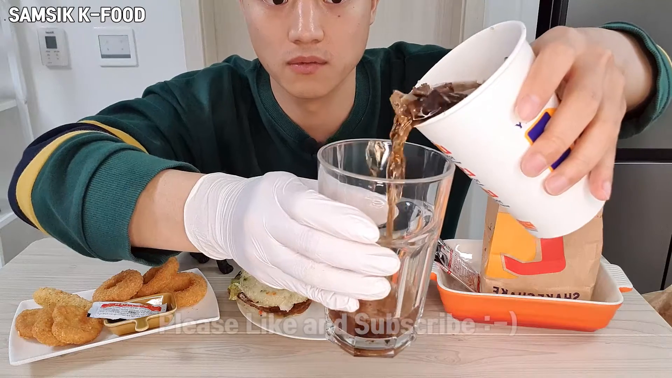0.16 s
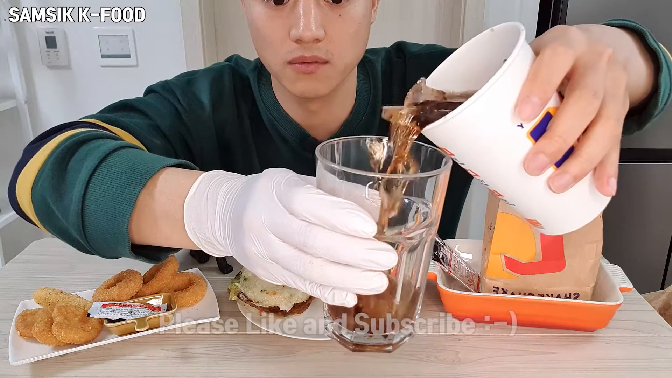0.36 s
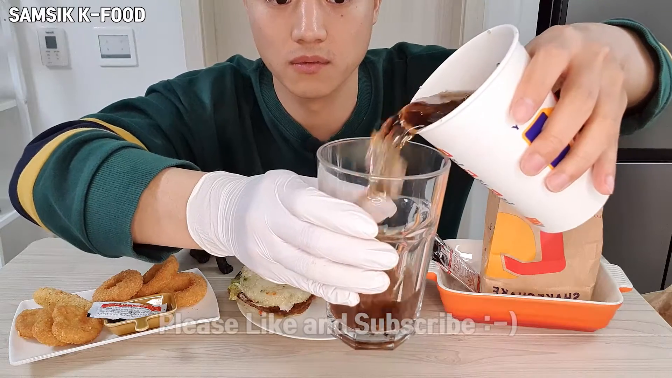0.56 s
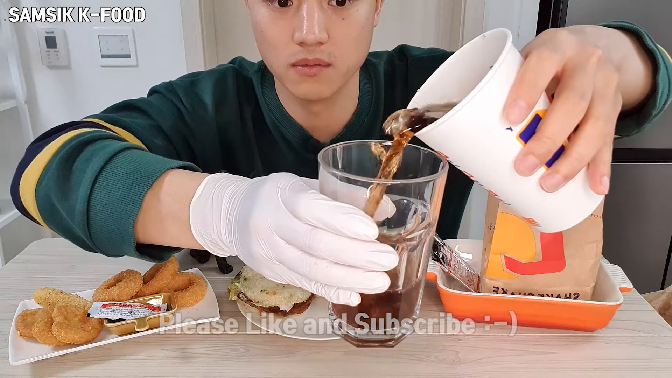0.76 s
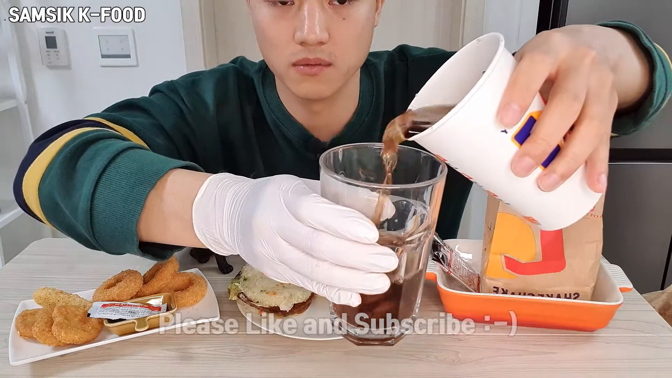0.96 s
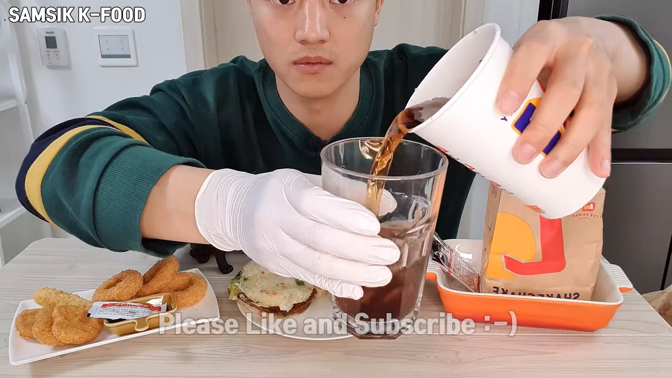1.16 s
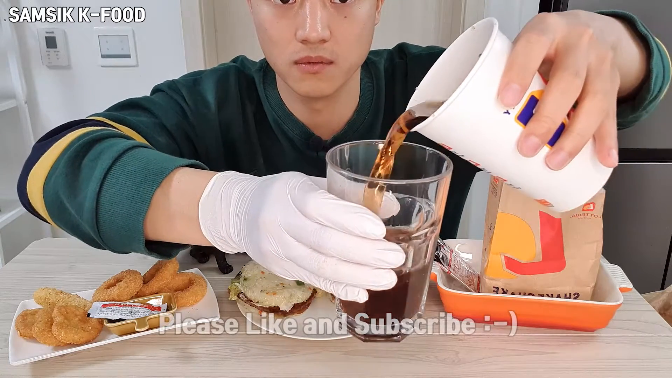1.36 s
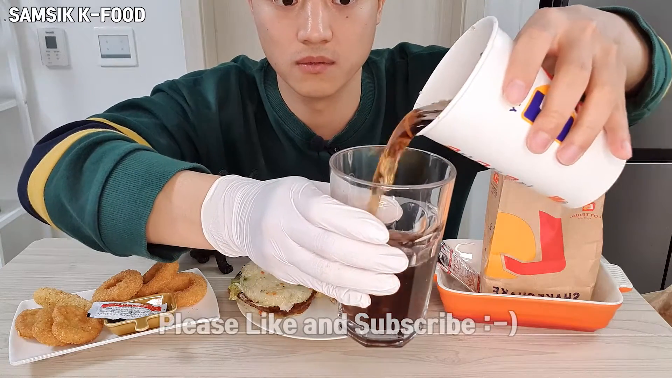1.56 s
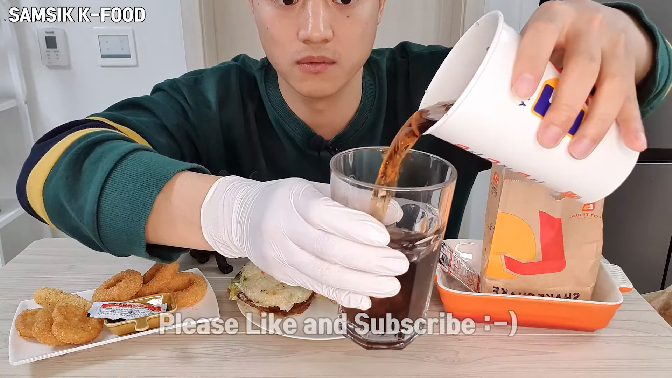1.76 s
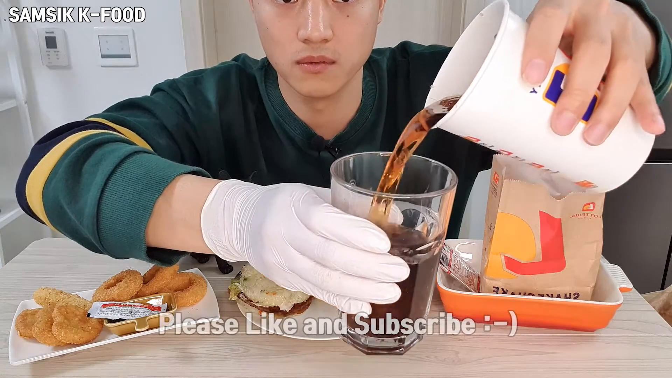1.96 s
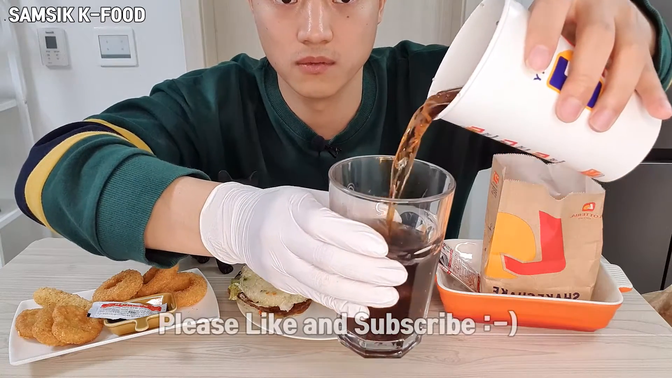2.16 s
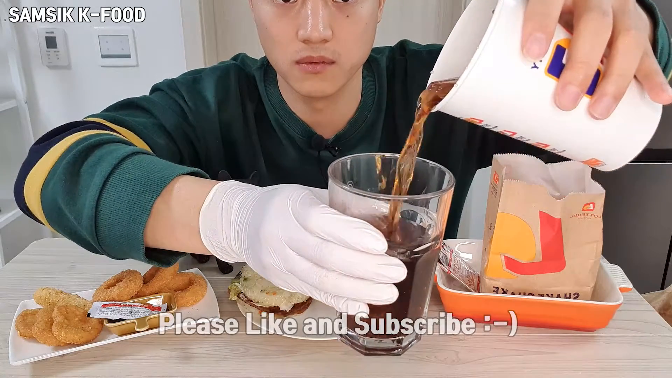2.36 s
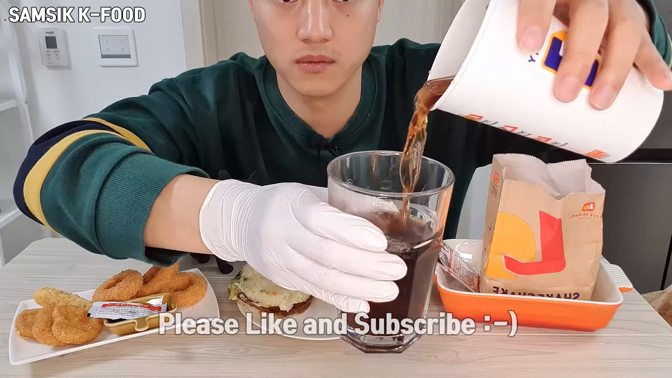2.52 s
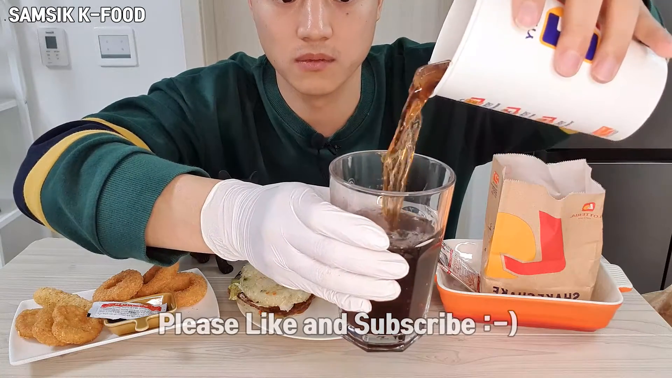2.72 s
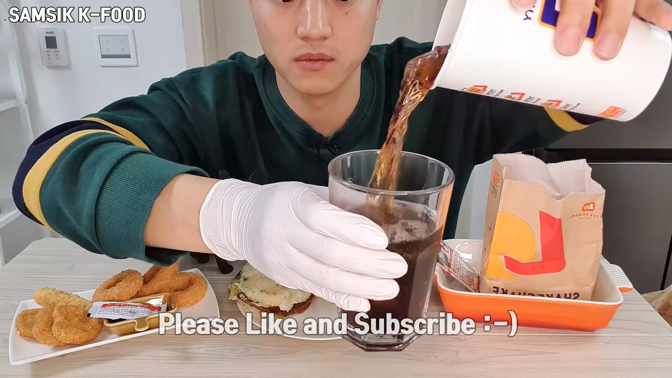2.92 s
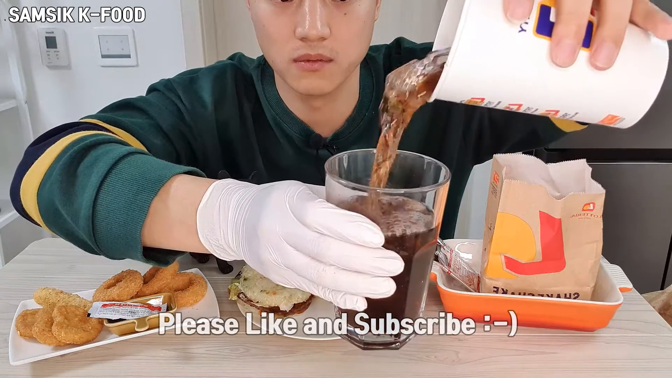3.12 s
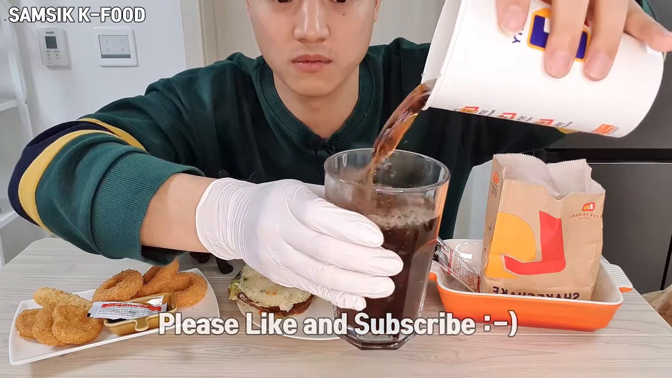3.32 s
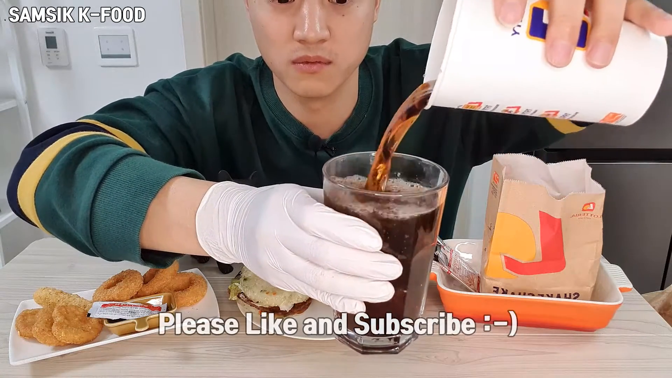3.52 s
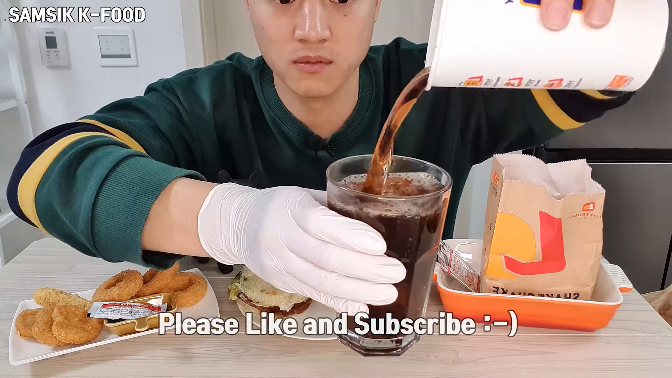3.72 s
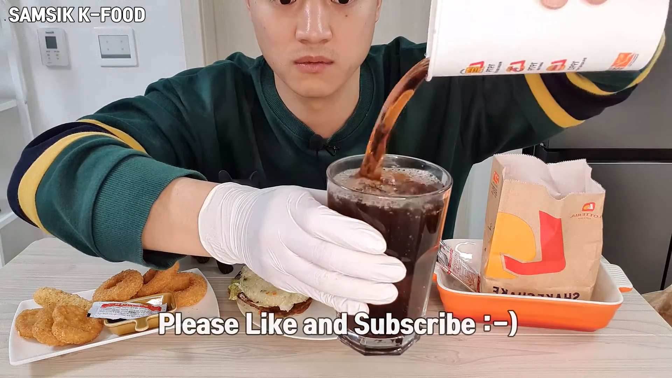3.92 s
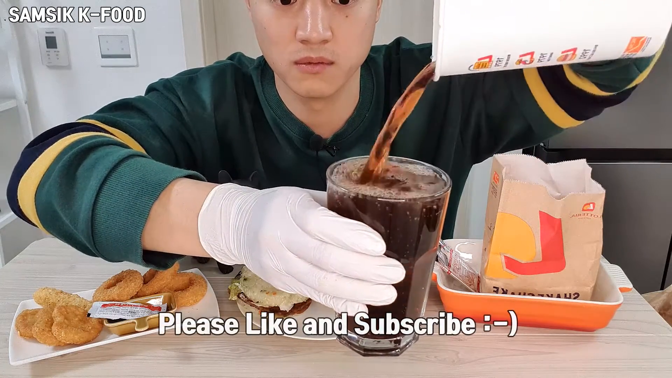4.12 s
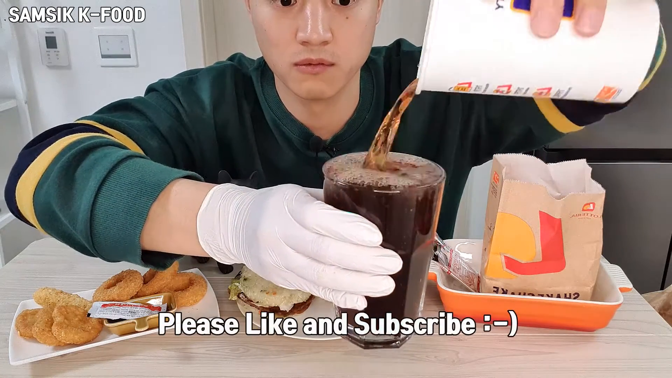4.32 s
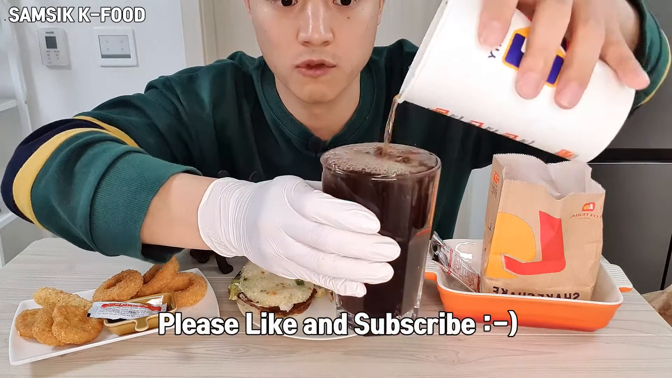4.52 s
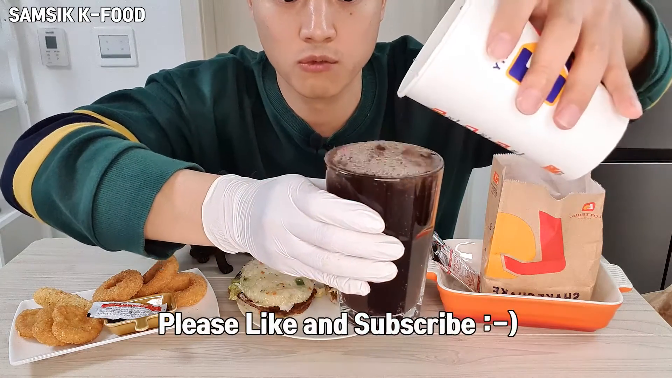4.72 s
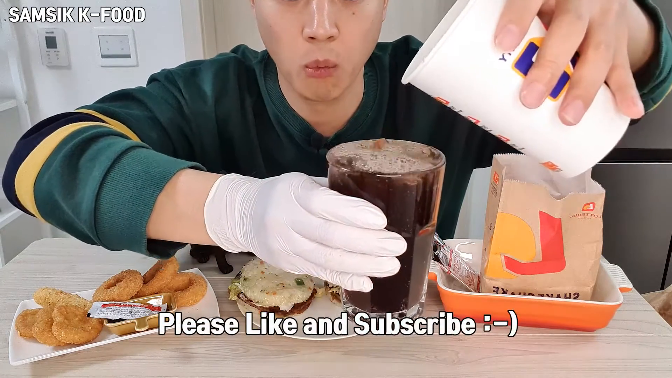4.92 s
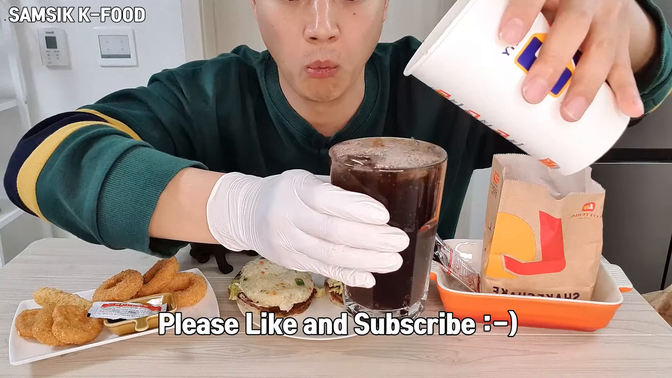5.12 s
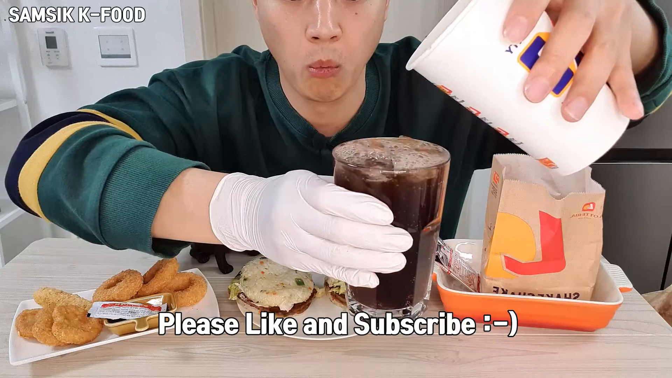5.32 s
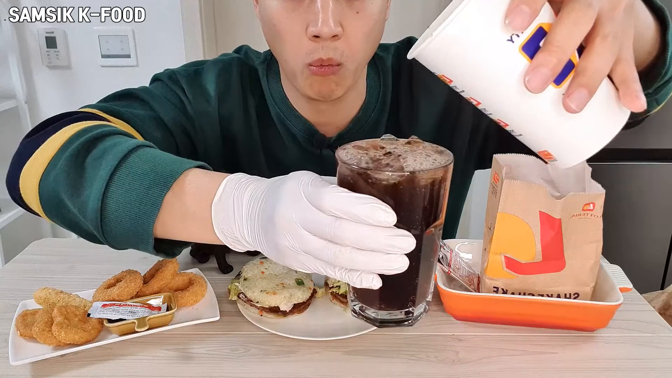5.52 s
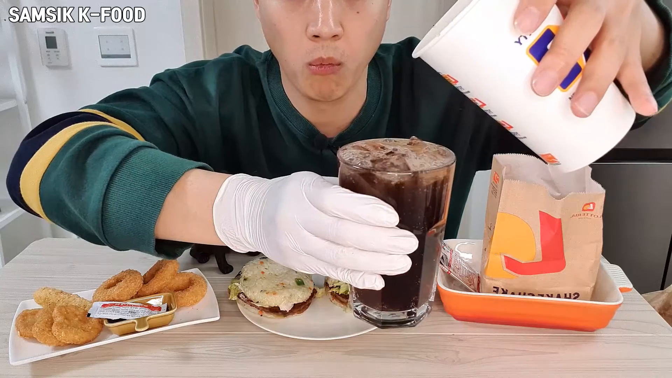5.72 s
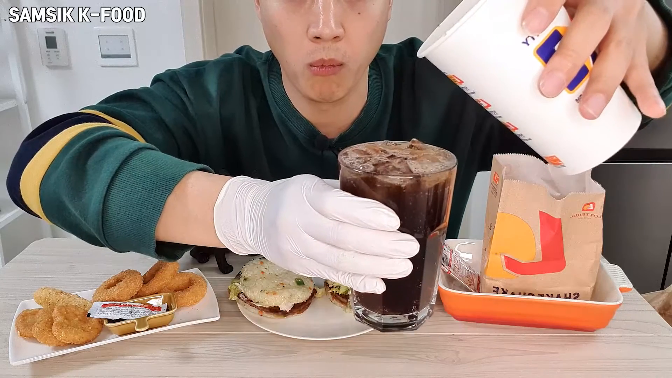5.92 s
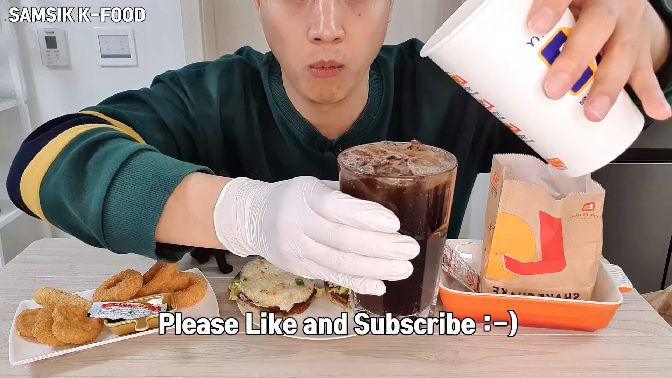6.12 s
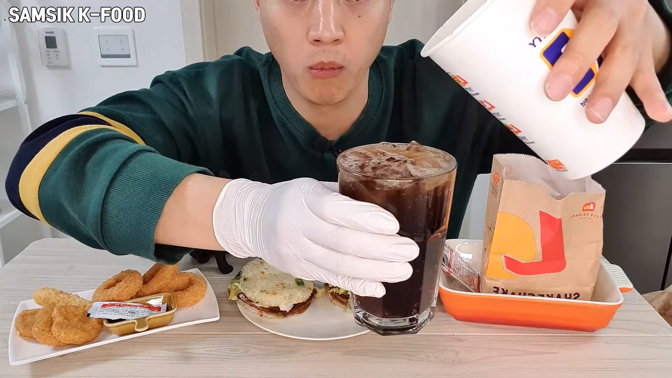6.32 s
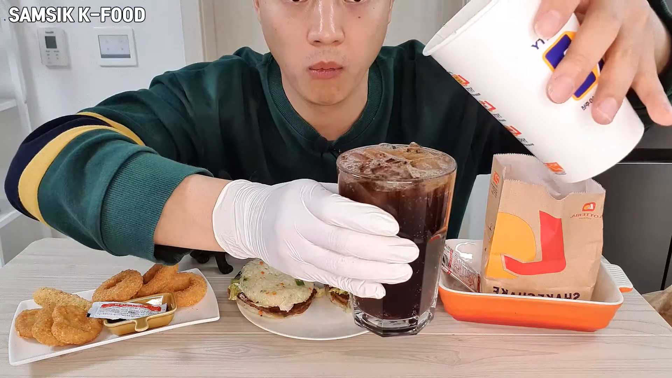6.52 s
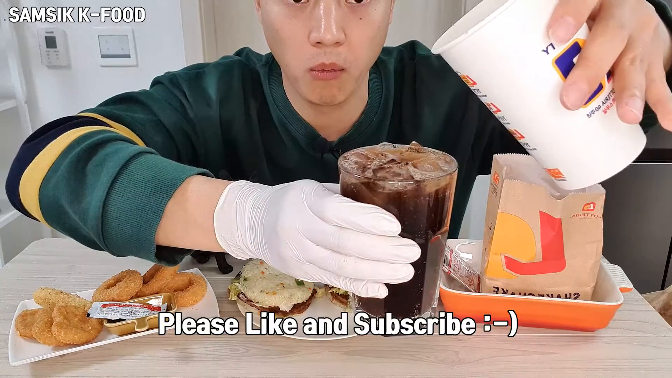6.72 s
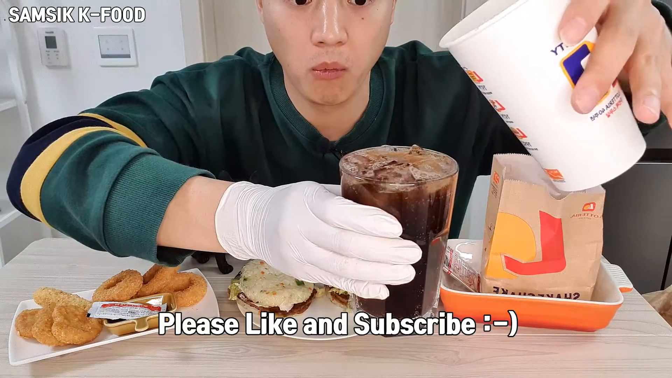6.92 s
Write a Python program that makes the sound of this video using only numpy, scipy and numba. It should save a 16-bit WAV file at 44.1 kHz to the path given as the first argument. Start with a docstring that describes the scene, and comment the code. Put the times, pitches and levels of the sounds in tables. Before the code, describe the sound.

Iced cola gurgles and splashes from a paper cup into a glass, cubes clinking sharply, then fading drips, soft cup rattles and quiet fizz.

```python
"""Indoor table in a quiet, small room, microphone close: cola and ice go from a paper cup into a hand-held glass.
Noise bursts for falling drops drive resonances of the shortening air column, the bubbly liquid and the glass wall.
Ice blows are damped notes with noise and glass ringing; large bubbles plop as sines gliding up.
Cubes left in the cup tick as it tips back; shaped noise gives the foam fizz and the room's low rumble."""
import sys
import numpy as np
from scipy import signal
from scipy.fft import rfft, irfft, next_fast_len
from scipy.io import wavfile
from scipy.ndimage import map_coordinates
from numba import njit

SR = 44100
rng = np.random.default_rng(int(sys.argv[2]) if len(sys.argv) > 2 else 0)


def unload_audio(sound):
    """Save the sound as a 16-bit wav file, at the path given as the first command line argument."""
    columns = np.transpose(np.atleast_2d(sound))
    # keep every value between -1 and 1, then stretch to whole-number steps
    steps = np.round(np.clip(columns, -1, 1) * 32767)
    wavfile.write(sys.argv[1], SR, steps.astype(np.int16))


N = 311919  # samples

# The pour through time, levels before mixing trims: start_s [s], gurgle_db [dB], splash_db [dB]
STREAM_LEVELS = [(0, -33.5, -56.5), (.25, -48.5, -55.5), (.51, -32.5, -51), (.63, -41, -41),
                 (.71, -30.5, -42), (.82, -24.5, -43), (.93, -36, -44.5), (1.25, -33.5, -51),
                 (1.48, -47, -45), (1.9, -36, -36), (2.15, -43, -41.5), (2.7, -53.5, -48), (3.02, -47, -40),
                 (3.33, -41.5, -39), (3.47, -28.5, -33.5), (3.66, -46, -40), (3.85, -48, -41.5),
                 (4.03, -51.5, -43.5), (4.22, -47.5, -40.5), (4.43, -45.5, -52.5), (4.63, -60, -47.5),
                 (5.14, -59.5, -50), (5.4, -73, -58), (5.62, -91, -63.5), (5.85, -97.5, -72.5)]
# Lowest mode of the bubbly liquid through time: start_s [s], pitch_hz [Hz], level_db [dB]
LIQUID_MODE = [(.8, 552, -44), (1.1, 471, -45), (1.25, 556.4, -43.5), (1.62, 612, -55), (1.85, 446, -45),
               (2.09, 316, -44.5), (2.26, 356, -56), (2.59, 271, -66), (2.85, 411, -56), (3.13, 297, -52),
               (3.4, 336, -38.5), (3.53, 280, -36), (3.68, 253, -54), (4.17, 340, -55), (4.45, 270, -53.5),
               (4.71, 327, -67.5), (5.2, 447, -65.5)]
# Higher modes of the air column: ratio to the lowest pitch [-], width_hz [Hz], level_db [dB]
COLUMN_OVERTONES = [(2.4, 600, 4.5), (4.4, 892, -1.5), (7.4, 820, -13.5)]
# Wall modes of the empty glass: pitch_hz [Hz], nominal level_db [dB], t60_s [s], share of pitch lost when full [-]
GLASS_MODES = [(1302, -17, 0.12, 0.0031), (1555, -14, 0.18, 0.0032), (2361, 0.5, 0.067, .075),
               (2967, -12.5, 0.077, 0.014), (3380, -21, .07, 0.16)]
# Relative colour of gurgling liquid: pitch_hz [Hz], level_db [dB per Hz]
SLOSH_COLOUR = [(200, -44), (330, 1.5), (600, 10), (1000, 6.5), (1600, -11.5), (3000, -52)]
# Relative colour of landing drops: pitch_hz [Hz], level_db [dB per Hz]
SPLASH_COLOUR = [(600, -41), (1100, -12.5), (1700, -6), (2300, -11), (3200, -3.5), (4500, -15), (6500, -7),
                 (10000, -56.5)]
# Relative colour of fine droplets: pitch_hz [Hz], level_db [dB per Hz]
SPRAY_COLOUR = [(4000, -16), (5500, 4), (6500, 2), (9500, -3.5), (10500, -21.5), (13000, -28.5),
                (15800, -33.5)]
# Surges of fine droplets: start_s [s], level_db [dB], top octave over that level [dB]
SPRAY_SURGES = [(0.467, -53.5, 1), (.684, -39.5, -12.5), (.716, -49, -4), (.747, -54.5, -11.5),
                (.8, -59, -11.5), (1.026, -45, -18), (1.196, -42, -19.5), (1.722, -47, -20),
                (1.881, -46.5, -26), (2.996, -52.5, -29), (3.12, -50.5, -24), (3.22, -55.5, -27),
                (3.358, -50, -5), (3.422, -51.5, -5.5), (4.062, -54, -23.5), (4.196, -56.5, -24.5),
                (4.407, -57.5, -16), (4.987, -56, -29)]
# Large bubbles and cavities closing: start_s [s], level_db before a common lift [dB], pitch_hz [Hz]
BUBBLE_PLOPS = [(.003, -27.5, 736), (.016, -25, 753), (.043, -32, 750), (.144, -21.5, 760),
                (.161, -25, 760), (.201, -22, 764), (.275, -23, 812), (.294, -24, 758), (.332, -21, 755),
                (.377, -22.5, 656), (.409, -23.5, 730), (.431, -22.5, 558), (.474, -15.5, 608),
                (.487, -9, 747), (0.593, -27.5, 505), (.662, -17.5, 808), (.691, -18, 681),
                (.711, -16, 663), (.734, -6, 731), (.751, -7, 728), (.779, -27.5, 884), (.853, -17, 510),
                (0.922, -19.5, 909), (1.03, -16.5, 462), (1.195, -13.5, 904), (1.3, -26.5, 523),
                (1.526, -31, 594), (1.635, -28.5, 584), (1.811, -30.5, 446), (1.879, -21, 399),
                (2.045, -40, 332), (2.067, -23, 1250), (2.177, -35, 790), (2.337, -44, 338),
                (2.781, -39.5, 378), (2.943, -36.5, 370), (3.071, -36, 326), (3.232, -25, 760),
                (3.352, -30, 314), (3.422, -16, 745), (3.439, -14, 505), (3.464, -11.5, 610),
                (3.481, -19, 320), (3.526, -40, 307), (3.562, -25, 304), (3.601, -19.5, 549),
                (3.673, -28, 267), (3.811, -38.5, 290), (3.845, -34.5, 258), (4.062, -26, 860),
                (4.105, -33.5, 343), (4.201, -28.5, 710), (4.353, -25, 617), (4.372, -38, 317),
                (4.409, -24.5, 608), (4.463, -27.5, 309), (4.553, -28.5, 736), (4.606, -32, 837),
                (4.653, -34, 1010), (5.149, -33, 980), (5.697, -58, 680)]
# Ice contacts: start_s [s], level_db [dB], cube pitch_hz [Hz], glass ring over that level [dB], high ping over it [dB]
ICE_CLINKS = [(0.096, -36, 1580, -32, -41), (0.298, -31, 3440, -19, -28), (0.456, -26, 2220, 3.5, -26),
              (0.4808, -14, 2200, -30.5, -36), (0.513, -21, 3280, -25, -31), (0.5567, -27, 2150, -22, -36),
              (0.592, -22, 1910, -33.5, -36), (0.6853, -16, 2140, -30, -30),
              (0.7139, -11, 2270, 3.5, -14.5), (0.7469, -11.5, 2226, -5.5, -20),
              (0.7795, -14, 1376, -18.5, -36), (0.787, -22, 3630, -12, -29), (0.8001, -16, 2940, -7, -38),
              (0.921, -23, 2294, -18, -35), (1.0293, -12, 2323, -17, -37), (1.1216, -29, 2410, -22, -27),
              (1.152, -24.5, 2360, -13, -31), (1.175, -23.5, 2350, -25, -36),
              (1.1957, -7.5, 2370, -18, -22), (1.2212, -13.5, 2330, -11, -23), (1.27, -27, 2860, -7, -25),
              (1.296, -25.5, 2380, -3.5, -28), (1.343, -27.5, 2200, -6, -21),
              (1.381, -28.5, 2350, 1.5, -31), (1.453, -23.5, 2205, -8.5, -27), (1.5189, -24, 2360, -9, -26),
              (1.5672, -35.5, 2240, 1, -30), (1.5986, -26.5, 2310, -2.5, -17), (1.698, -29, 2340, 3, -25),
              (1.7282, -14.5, 2420, -6.5, -19), (1.81, -24, 2360, 1.5, -32), (1.861, -36, 2260, 2, -26),
              (1.879, -20, 2340, -37, -21), (1.919, -23, 2410, -7.5, -5.5), (1.9889, -31, 2300, 2.5, -30),
              (2.024, -38, 3000, -14, -28), (2.071, -24, 3030, -3.5, -3.5), (2.115, -28.5, 2240, -3.5, -25),
              (2.128, -37, 2090, -14, -31), (2.181, -28.5, 1600, -1.5, -11.5),
              (2.2715, -29.5, 1360, -9, -13), (2.302, -31, 3100, -3, -13), (2.327, -24, 2294, -1, -27),
              (2.4356, -32.5, 3530, -4, -10), (2.537, -28, 2120, -14, -16), (2.652, -47, 2230, -3, -1),
              (2.709, -47.5, 2250, 11, -29), (2.7387, -30, 2500, -8, -17), (2.7813, -25.5, 2160, -2, -19),
              (2.798, -34, 3200, -12, -10), (2.8515, -29, 3060, -6, -27), (2.9, -44, 2850, -10, -18),
              (2.9428, -24, 1330, 1.5, -15), (2.9563, -28, 2440, -18, -6), (2.988, -28, 2200, -6, 2.5),
              (2.997, -37, 2950, -4, -16), (3.121, -20, 2970, -7.5, -17), (3.156, -27, 2090, 1.5, -25),
              (3.226, -30, 2890, -15.5, -11), (3.279, -31, 1390, -28, -16), (3.339, -30, 2940, -10.5, -20),
              (3.3467, -19.5, 2190, -11, -22), (3.359, -16, 1990, -31, -23), (3.372, -30, 1900, -17.5, -32),
              (3.4234, -8, 3000, -15, -33), (3.4403, -2, 2150, -8.5, -3.5), (3.5263, -16, 1800, 15, -40),
              (3.6562, -21.5, 2100, 2, -41), (3.708, -32.5, 1940, -31, -34), (3.948, -29, 2930, -30, -35),
              (3.999, -27.5, 3120, -14, -35), (4.062, -18, 3670, -2, -34), (4.1034, -23.5, 1440, -19, -58),
              (4.1377, -21, 2780, -12, -39), (4.189, -27, 1880, -20, -29), (4.195, -18.5, 1790, -11, -39),
              (4.2227, -15.5, 1960, -12, -43), (4.25, -23, 3230, -15, -34), (4.316, -27.5, 2330, -20, -31),
              (4.338, -26, 2270, -11, -33), (4.4073, -18, 2080, -20, -29), (4.4643, -20.5, 2760, -34, -34),
              (4.483, -25, 4020, -30, -34), (4.554, -31, 1490, -24, -35), (4.628, -34, 2950, -35, -35)]
# Cubes shifting in the paper cup: start_s [s], peak level_db before the cup's bass loss [dB], pitch_hz [Hz]
CUP_TICKS = [(4.654, -36, 1830), (4.7211, -30.5, 3230), (4.7646, -32, 1550), (4.802, -35.5, 1550),
             (4.8616, -28.5, 3100), (4.9223, -29, 2980), (4.9435, -27.5, 1680), (4.9898, -31.5, 3730),
             (4.9965, -26.5, 1830), (5.035, -38.5, 2770), (5.1282, -38, 2080), (5.148, -31, 3450),
             (5.1785, -33.5, 2090), (5.263, -40, 3600), (5.277, -42, 1890), (5.2854, -38.5, 1730),
             (5.291, -34.5, 1750), (5.3064, -31, 1960), (5.4244, -47, 2160), (5.453, -50, 1910),
             (5.4897, -42, 1504), (5.528, -43, 1570), (5.561, -52.5, 1770), (5.583, -43, 2560),
             (5.5934, -49, 1610), (5.6314, -51, 1910), (5.6961, -46, 3125), (5.7315, -47, 4130),
             (5.746, -40.5, 2020), (5.7515, -40.5, 2780), (5.804, -48, 3820), (5.817, -53, 2690)]
# Single droplets heard high in the spray: start_s [s], level_db [dB], pitch_hz [Hz]
SINGLE_DROPLETS = [(0.0996, -38.5, 6000), (0.454, -41, 6470), (0.688, -24, 9100), (0.7163, -31, 6400),
                   (0.738, -30, 6090), (0.801, -33, 6340), (1.153, -39, 5920), (1.1742, -39, 6340),
                   (1.204, -27, 5970), (1.3622, -38, 5830), (1.4012, -40.5, 5900), (1.6004, -31, 6040),
                   (1.8816, -33, 5750), (1.8957, -31.5, 8720), (2.163, -43, 5950), (2.9562, -34, 5300),
                   (2.996, -29, 6180), (3.2284, -36, 7600), (3.2807, -33.5, 5580), (3.359, -30.5, 6200),
                   (3.709, -35, 5280), (4.12, -40, 6100), (4.2168, -33.5, 6230), (4.3161, -35, 5210),
                   (4.337, -35.5, 4426), (6.057, -57, 5740)]
# Relative colour of bursting froth: pitch_hz [Hz], level_db [dB per Hz]
FOAM_COLOUR = [(700, -40), (1200, -12), (3000, -11), (5300, -11), (6300, -2), (9500, 0), (10400, -10),
               (13000, -14), (15800, -15)]
# Relative colour of the room's rumble: pitch_hz [Hz], level_db [dB per Hz]
ROOM_COLOUR = [(28, -33.5), (40, -6), (53, 3), (80, -12), (150, -8), (250, -16), (400, -10.5), (630, -20),
               (1000, -24.5), (2000, -38)]
# Decay of the room's answer: pitch_hz [Hz], t60_s [s]
ROOM_DECAY = [(200, 0.12), (2000, 0.22), (10000, 0.016)]

FULL_S = 3.5  # the drink nears the rim
# the air column shortens steadily between two moments, so its pitch rises and its note blurs
EMPTY_HZ, FULL_HZ, RISE_FROM_S, RISE_TO_S = 826, 1439, 0.27, 3.25
CLEAR_EMPTY, CLEAR_LOSS_PER_S = 0.72, 0.12  # share of clear note in the gurgle
SURGE_RISE_S, SURGE_FALL_DB_PER_S, MIST_UNDER_SPLASH_DB = 0.0018, 242.5, 26.5
PLOP_CYCLES = 31.4  # cycles to die away by 60 dB, before froth damps the bubble
FROTH_DAMPING = 1  # extra loss of a bubble once the glass is full of froth
# high wall mode, which only some blows wake; the last value is the share of pitch lost when full
PING_HZ, PING_IN_POUR_DB, PING_T60_S, PING_LOST = 4695, -26, .065, .011
WASH_DB, WASH_T60_S = -24, 0.13  # drink thrown about by a cube, relative to its blow
KNOCK_T60_S, FROTH_SHORTENS = 0.031, .7  # knock in a froth-free glass; extra damping when full
DROPLET_T60_S = 0.02
FOAM_DB, ROOM_TONE_DB = -72, -72
TOP_HZ = 15830  # upper limit of the recorder


def stream():
    """Blobs of liquid excite the air column, the liquid and the glass wall; drops and bubbles add splash and mist."""
    gurgle_db, splash_db = curves(STREAM_LEVELS + [(5.95, -110, -110)])
    liquid_hz, liquid_db = curves([(.3, 639, -68.5)] + LIQUID_MODE + [(5.6, 396.6, -110)])
    column_hz, clear = air_column()
    fill = np.clip(np.arange(N) / SR / FULL_S, 0, 1)

    blobs = patter(160, size_db=3, t60=.06)
    column = resonance(lumpy(55, depth_db=4.0), column_hz, width_hz=140)
    glugs = grains(count=1500, centre_hz=900, spread=.45, cycles=9, size_db=4, rise=.03)
    blurred = .6 * coloured(blobs, SLOSH_COLOUR) + 0.82 * glugs
    gurgle = clear * column + (1.05 - clear) * blurred
    liquid = resonance(blobs, liquid_hz, width_hz=31)
    # the moving weight of the drink shakes the table top
    table = fill * band(lumpy(12, depth_db=2.5), 80, 170)

    # drops of three sizes land independently, each size in its own band
    landing = sum(band(patter(170, size_db=5, t60=.025), hz / 1.5, hz * 1.5)
                  for hz in (1700, 3300, 6500))
    wall_modes = GLASS_MODES + [(PING_HZ, PING_IN_POUR_DB, PING_T60_S, PING_LOST)]
    wall = sum(amp(db / 2) * resonance(landing, hz * (1 - lost * fill), width_hz=85)
               for hz, db, _, lost in wall_modes)
    upper = sum(amp(db) * resonance(landing, ratio * column_hz, width_hz)
                for ratio, width_hz, db in COLUMN_OVERTONES)
    bubbles = grains(count=3000, centre_hz=2000, spread=.4, cycles=9, size_db=3.5, rise=.02)
    splash = 0.48 * coloured(landing, SPLASH_COLOUR) + 0.75 * bubbles
    splash += 0.6 * fill ** .5 * (1.1 - fill ** 8) * wall  # grows with the drink, deadened near the rim
    splash += 1.6 * (1 - fill) ** 3 * upper  # fades as the glass fills

    drink = amp(gurgle_db) * gurgle + amp(liquid_db) * liquid
    drink += amp(splash_db - 7.5) * splash + spray(splash_db)
    return drink, amp(liquid_db - 19.0) * table


def air_column():
    """Pitch and clearness of the air above the drink; pitch is inverse to its length."""
    t = np.arange(N) / SR
    risen = np.clip((t - RISE_FROM_S) / (RISE_TO_S - RISE_FROM_S), 0, 1)
    rocking = 1 + .05 * wobble(14)  # the surface of the drink rocks
    length = (1 - risen) / EMPTY_HZ + risen / FULL_HZ
    clear = np.clip(CLEAR_EMPTY - CLEAR_LOSS_PER_S * t, .05, 1)
    return rocking / length, clear


def spray(splash_db):
    """Fine droplets: a thin share of the splash, and a quick rise and steady fall at each surge."""
    gain, t = np.zeros((2, N + SR)), np.arange(SR // 3) / SR
    shape = np.clip(t / SURGE_RISE_S, 0, 1) ** 2 * amp(-SURGE_FALL_DB_PER_S * t)
    for start_s, db, top_db in SPRAY_SURGES:
        gain[:, round(start_s * SR):][:, :len(t)] += amp([[db], [db + top_db]]) * shape
    fine_gain, top_gain = gain[:, :N]
    plinks = grains(count=900, centre_hz=6100, spread=.13, cycles=6, size_db=4.5, rise=.01)
    fine = coloured(patter(350, size_db=6.0, t60=0.0092), SPRAY_COLOUR) + 0.87 * plinks
    mist = (fine_gain + amp(splash_db - MIST_UNDER_SPLASH_DB)) * fine
    top = band(patter(400, size_db=4.0, t60=0.036), 9000, 15000)
    return mist + top_gain * top


def plops():
    """Each trapped pocket of air swells and rings briefly, its pitch gliding up a little."""
    out, t = np.zeros(N + SR), np.arange(SR // 5) / SR
    for start_s, db, hz in BUBBLE_PLOPS:
        cycles = PLOP_CYCLES / (1 + FROTH_DAMPING * min(start_s / FULL_S, 1) ** 8)
        swell = (1 - np.exp(-t / 0.0021)) ** 2 * amp(-60 * t * hz / cycles)
        note = np.sin(2 * np.pi * hz * t * (1 + 0.27 * t))
        add_at(out, start_s, amp(db + 6.5) * swell * note)
    return out[:N]


def clinks():
    """Each cube contact also rings the glass; the rising drink lowers its modes and finally deadens them."""
    out, t = np.zeros(N + SR), np.arange(SR // 5) / SR
    for start_s, db, cube_hz, ring_db, ping_db in ICE_CLINKS:
        fill = min(start_s / FULL_S, 1)
        froth = fill ** 8
        damping = 1 + 6 * froth
        ring = 0
        for hz, level_db, t60, lost in GLASS_MODES:
            # where the cube strikes changes how strongly the weaker modes answer
            spot, detune = rng.random(2) - .5
            decay = amp(level_db * (1.5 + .8 * spot) - 60 * t * damping / t60)
            ring = ring + decay * np.sin(2 * np.pi * hz * (1 - lost * fill + 0.014 * detune) * t)
        ping = amp(ping_db - 60 * t * damping ** .7 / PING_T60_S)
        ping *= np.sin(2 * np.pi * PING_HZ * (1 - PING_LOST * fill) * t)
        ring = (1 - np.exp(-t / 0.0022)) * (amp(ring_db) * ring + ping)
        wash = amp(WASH_DB - 60 * t / WASH_T60_S) * (1 - np.exp(-t / 0.0018))
        wash *= band(rng.standard_normal(len(t)), 630, 3800)
        knock_t60 = KNOCK_T60_S / (1 + FROTH_SHORTENS * froth)
        knock = contact(t, cube_hz, note_db=-4.0, crack_db=-30.5, t60=knock_t60)
        add_at(out, start_s, amp(db) * (ring + knock + wash))
    return out[:N]


def contact(t, hz, note_db, crack_db, t60):
    """One cube against another thing: a dull noisy note, a wider rattle and a bright crack."""
    shape = (1 - np.exp(-t / 0.00072)) ** 2 * amp(-60 * t / t60)
    size = np.sqrt(np.mean(shape ** 2))
    noise = shape * rng.standard_normal((3, len(t)))
    knock = amp(-11.5) * band(noise[0], hz / 1.327, hz * 1.316)
    rattle = amp(-8.0) * band(noise[1], 1300, 4300)
    crack = amp(crack_db) * band(noise[2], 5900, 10000)
    note = amp(note_db) * shape * np.sin(2 * np.pi * hz * t)
    return note + size * (knock + rattle + crack)


def cup():
    """Paper does not ring: the cubes in the cup only tick."""
    out, t = np.zeros(N + SR), np.arange(SR // 10) / SR
    for start_s, db, hz in CUP_TICKS:
        tick = contact(t, hz, note_db=-7, crack_db=-25.5, t60=0.015)
        add_at(out, start_s, amp(db) * tick / np.abs(tick).max())
    # the light wall gives no lows
    return filtered(out[:N], lambda hz: 1 / np.sqrt(1 + (1300 / (hz + 1)) ** 8))


def droplets():
    """Each one a short, slightly noisy plink."""
    out, t = np.zeros(N + SR), np.arange(SR // 20) / SR
    for start_s, db, hz in SINGLE_DROPLETS:
        noise = band(rng.standard_normal(len(t)), hz / 1.2, hz * 1.2)
        note = np.sin(2 * np.pi * hz * t) + .6 * noise
        shape = amp(db - 60 * t / DROPLET_T60_S) * (1 - np.exp(-t / 0.00063))
        add_at(out, start_s, shape * note)
    return out[:N]


def foam():
    """Countless tiny bubbles burst in the froth: a fine, smooth hiss of shaped noise."""
    return amp(FOAM_DB) * coloured(rng.standard_normal(N), FOAM_COLOUR)


def walls(x):
    """The room's answer, a noise tail in which each frequency dies at its own speed."""
    hz, t, z = signal.stft(rng.standard_normal(SR // 2), SR, nperseg=256)
    decay = amp(-60 * t / along(ROOM_DECAY, hz)[:, None])
    tail = signal.istft(z * decay, SR, nperseg=256)[1]
    delayed = np.pad(x, (200, 0))  # samples, about 4.5 ms
    return signal.fftconvolve(delayed, tail / np.linalg.norm(tail))[:N]


def room_tone():
    """Low, slightly unsteady rumble of the room."""
    rumble = coloured(rng.standard_normal(N), ROOM_COLOUR + [(3500, -120)])
    return amp(ROOM_TONE_DB + 0.94 * wobble(6.2)) * rumble


def patter(rate, size_db, t60):
    """Noise in sudden little bursts, one for each drop that lands (rate per second), at rms 1."""
    draw = rng.random((2, N))
    size = amp(np.minimum(-size_db * np.log(draw[1] + 1e-9), 3.8 * size_db))
    drops = (draw[0] < rate / SR) * size
    envelope = signal.lfilter([1], [1, -amp(-60 / (t60 * SR))], drops)
    return unit(envelope * rng.standard_normal(N))


def lumpy(rate, depth_db):
    """Noise whose level jumps about, as the stream breaks into blobs."""
    level_db = depth_db * wobble(rate) + depth_db / 2 * wobble(rate / 4)
    return unit(amp(level_db) * rng.standard_normal(N))


def grains(count, centre_hz, spread, cycles, size_db, rise):
    """Small bubbles at random times: damped sines whose pitch glides up, at rms 1."""
    draw, t = rng.random((count, 3)), np.arange(900) / SR
    hz = np.clip(centre_hz * np.exp(spread * rng.standard_normal((count, 1))), 500, 14000)
    turns = hz * t
    size = amp(np.minimum(-size_db * np.log(draw[:, 1:2] + 1e-9), 4 * size_db))
    swell = (1 - np.exp(-turns)) * np.exp(-turns / cycles) * (1 - t / t[-1])
    shape = size * swell * np.sin(2 * np.pi * turns * (1 + rise * turns / cycles))
    at = (draw[:, :1] * N).astype(int) + np.arange(len(t))
    return unit(np.bincount(at.ravel(), shape.ravel(), N + len(t))[:N])


@njit
def resonator(x, turn, pole):
    """Two-pole resonance whose pitch (radians per sample) moves."""
    y = np.zeros(len(x))
    for i in range(2, len(x)):
        y[i] = np.sin(turn[i]) * x[i] + 2 * pole * np.cos(turn[i]) * y[i - 1] - pole * pole * y[i - 2]
    return y


def resonance(x, hz, width_hz):
    """x through a moving resonance, applied twice for steep skirts, at rms 1."""
    turn, pole = 2 * np.pi * hz / SR, np.exp(-np.pi * width_hz / SR)
    return unit(resonator(resonator(x, turn, pole), turn, pole))


def band(x, low_hz, high_hz):
    """x inside a band, at rms 1."""
    sos = signal.butter(3, [low_hz, high_hz], "band", fs=SR, output="sos")
    return unit(signal.sosfilt(sos, x))


def filtered(x, response):
    """x times a complex response of frequency."""
    m = next_fast_len(len(x) + 8192)
    return irfft(rfft(x, m) * response(np.fft.rfftfreq(m, 1 / SR)), m)[:len(x)]


def coloured(x, spectrum):
    """x with a (Hz, dB) colour, at rms 1."""
    return unit(filtered(x, lambda hz: amp(along(spectrum, hz))))


def along(points, hz):
    """(Hz, value) points on a log axis."""
    f, v = np.transpose(points)
    return np.interp(np.log(hz + 1), np.log(f + 1), v)


def curves(rows):
    """One value per sample for each column after the time."""
    s, *cols = np.transpose(rows)
    return [np.interp(np.arange(N) / SR, s, c) for c in cols]


def wobble(rate):
    """A smooth random curve, rate knots a second."""
    knots = rng.standard_normal(int(N * rate / SR) + 4)
    return map_coordinates(knots, [np.arange(N) * rate / SR])


def add_at(out, start_s, sound):
    """Mix a sound into out from start_s on."""
    out[round(start_s * SR):][:len(sound)] += sound


def amp(db):
    """dB to gain."""
    return 10 ** (np.asarray(db) / 20)


def unit(x):
    """x at rms 1."""
    return x / np.sqrt(np.mean(x ** 2) + 1e-20)


def scene():
    """The pour close to the microphone, in a small room; so small a source radiates no bass."""
    drink, table = stream()
    no_bass = signal.butter(8, 235, "high", fs=SR, output="sos")
    pour = signal.sosfilt(no_bass, drink + plops() + clinks() + cup() + droplets())
    close = pour + amp(-12.5) * walls(pour)
    return (close + table + foam() + room_tone())[None]


def record(dry):
    """The recorder keeps nothing above its band limit."""
    return filtered(dry[0], lambda hz: hz < TOP_HZ)[None]


dry = scene()
out = record(dry)
unload_audio(out)
```